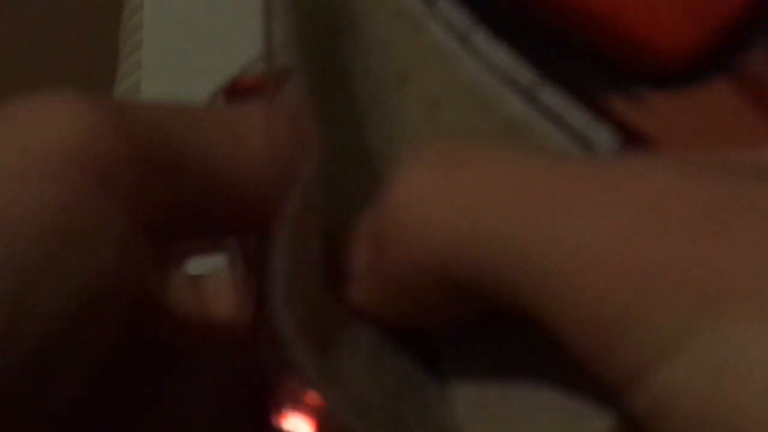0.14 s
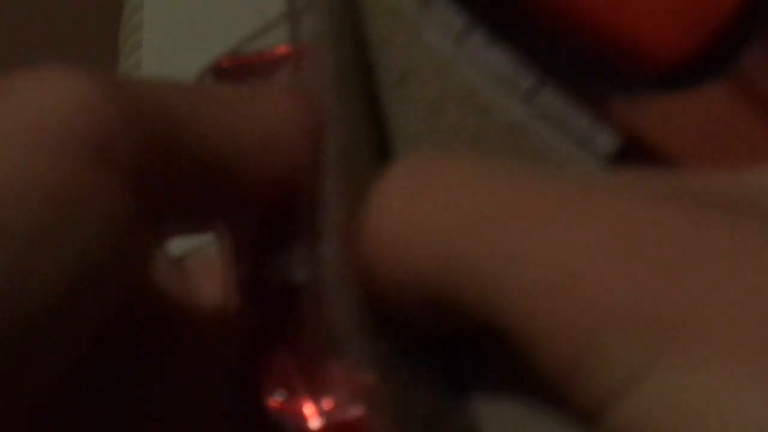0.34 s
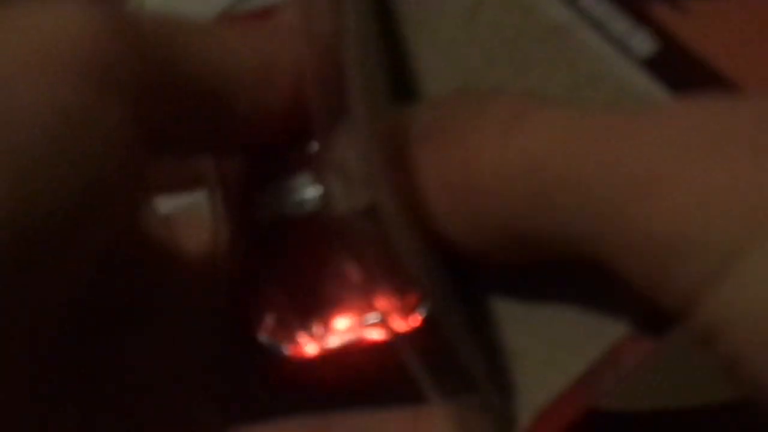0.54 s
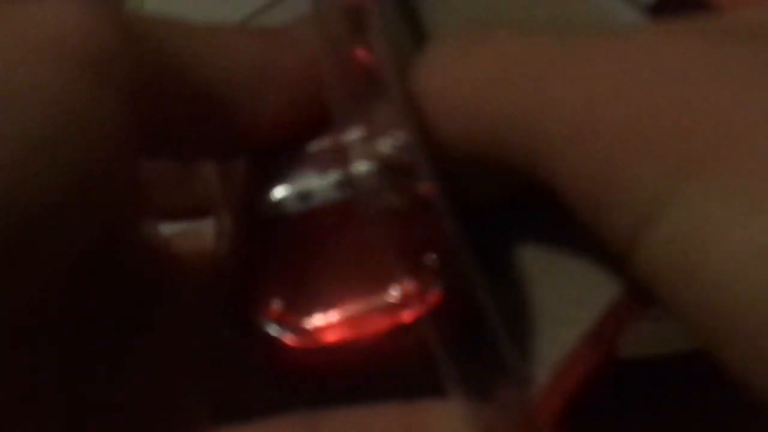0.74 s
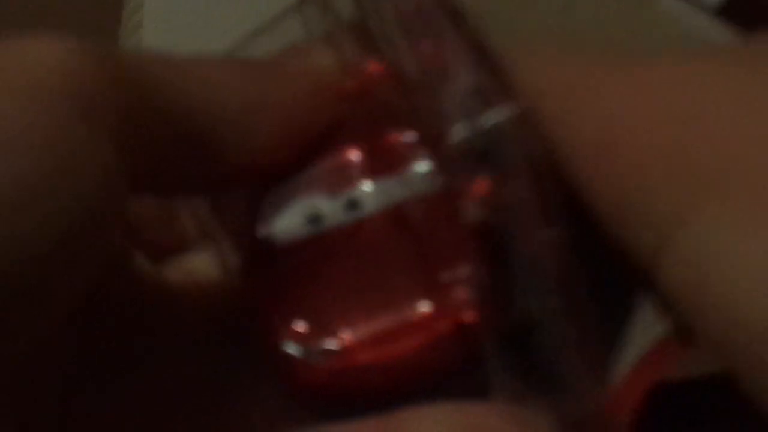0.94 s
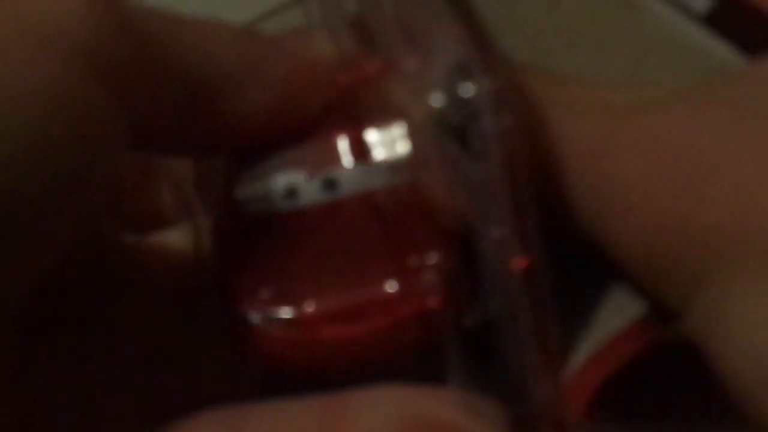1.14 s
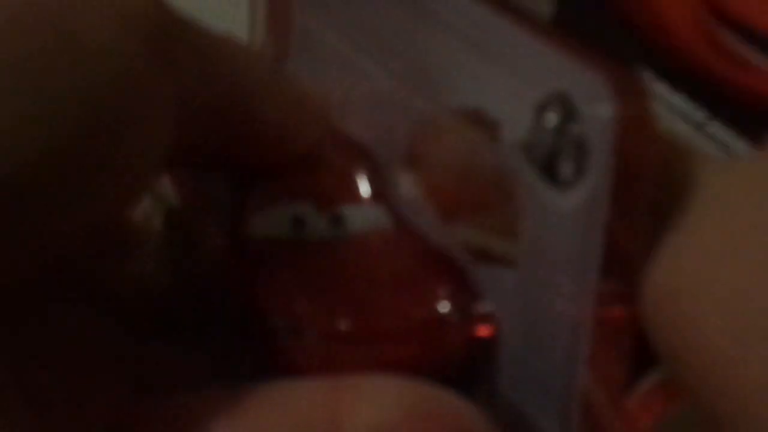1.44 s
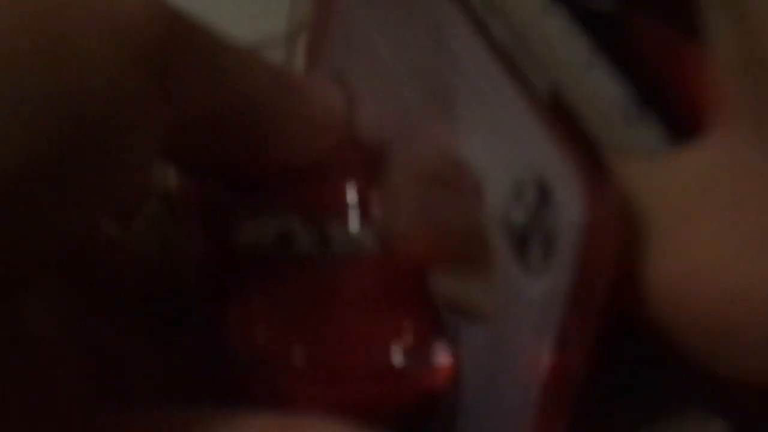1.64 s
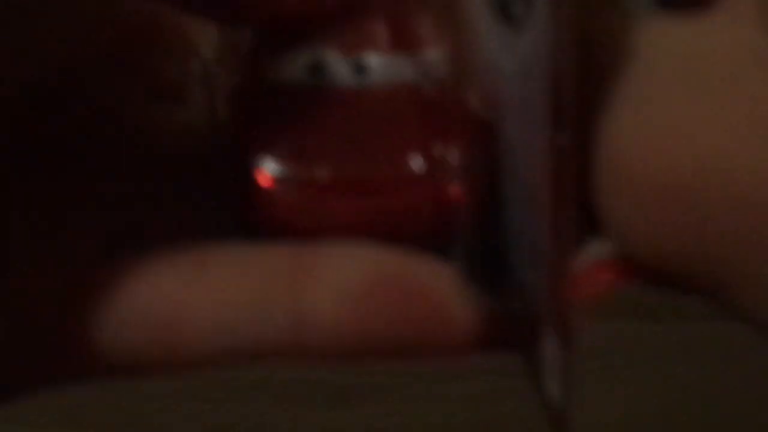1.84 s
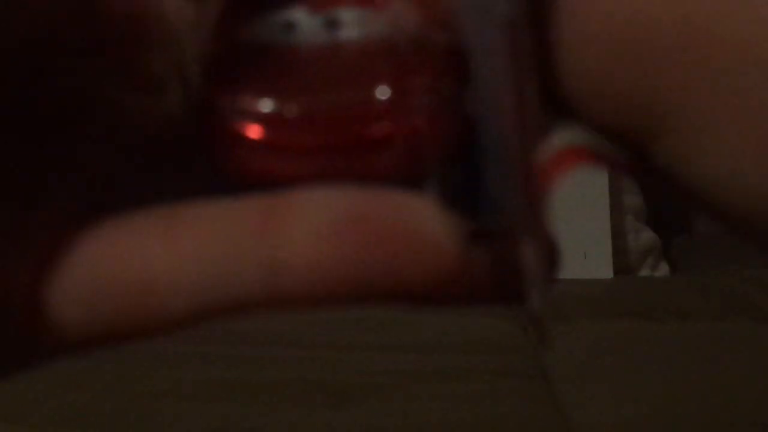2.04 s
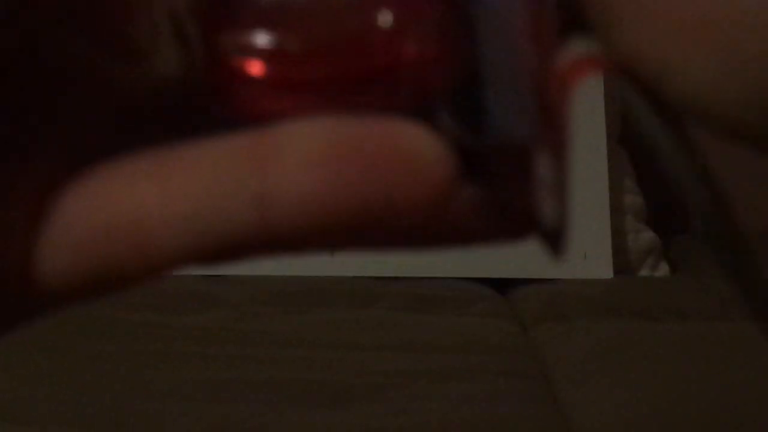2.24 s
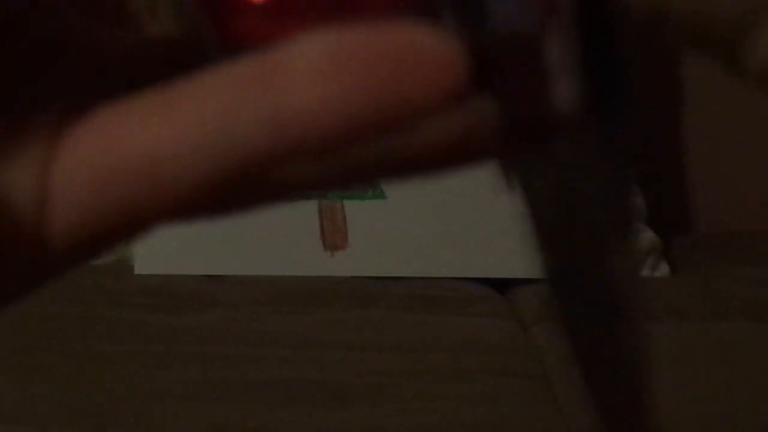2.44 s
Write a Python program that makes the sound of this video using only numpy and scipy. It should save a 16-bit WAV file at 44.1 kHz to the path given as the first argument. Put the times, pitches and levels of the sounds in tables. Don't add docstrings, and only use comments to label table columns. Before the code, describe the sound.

Stiff plastic packaging buckles and tears from card, close in a small bare room. After brief hiss, a very loud clipped pop cluster bursts at 0.2 s and rings out. Lighter pops follow around 0.6 s, sharper crackling at 0.8 and 1.05, fine ticks and rubbing with soft table bumps from 1.25 to 1.65, faint rustle near 1.8-2.1, then ticks and a strong bright crack around 2.4.

```python
import sys
import numpy as np
from scipy import signal
from scipy.fft import rfft, irfft
from scipy.io import wavfile

SR = 44100
rng = np.random.default_rng(int(sys.argv[2]) if len(sys.argv) > 2 else 0)


def log_audio(samples):
    frames = np.atleast_2d(samples).T
    limited = np.clip(frames, -1, 1)
    pcm = np.round(limited * 32767).astype(np.int16)
    wavfile.write(sys.argv[1], SR, pcm)


def voltage_ratio(decibels):
    exponent = np.asarray(decibels, float) / 20
    return 10 ** exponent


N = 114660

# frequency in Hz, level in dB, t60 in seconds.
SHELL = [(308.8, -18.5, .025), (401, -13.5, 0.0248), (700, -13.5, 0.025), (936, -1.5, 0.0091),
         (1200, -7.5, 0.028), (1700, 4, 0.0058), (2005, 5.5, 0.0033), (2910, -4.5, 0.007),
         (3260, 3.5, 0.0032), (4300, -3, 0.0038), (6030, 2.5, 0.00083), (9180, -6.5, 0.0013),
         (11000, -4.5, 0.0011), (14580, -8.5, 0.00067)]


def rms_one(x):
    return x / np.sqrt(np.mean(x ** 2) + 1e-20)


def ring(clicks, hz, t60_s):
    radius = voltage_ratio(-60 / (t60_s * SR))
    angle = 2 * np.pi * hz / SR
    poles = [1, -2 * radius * np.cos(angle), radius ** 2]
    return signal.lfilter([0, np.sin(angle)], poles, clicks + 1e-18)


def colour_db(hz, panel_hz, tilt_db):
    lift_db, width_octaves = 5.5, 0.61
    octaves = np.log2(hz / panel_hz)
    lift = lift_db * np.exp(-0.5 * (octaves / width_octaves) ** 2)
    return lift + tilt_db * np.maximum(octaves, 0)


def hiss():
    # frequency in Hz, density in dB per Hz.
    spectrum = [(20, -8.5), (55, -25.5), (130, -2.5), (300, -2), (800, 3), (2500, -6.5), (6000, -11),
                (15000, -13.5)]
    level_db = -54
    hz = np.maximum(np.fft.rfftfreq(N, 1 / SR), 1)
    at_hz, density_db = np.transpose(spectrum)
    gain = voltage_ratio(np.interp(np.log(hz), np.log(at_hz), density_db))
    noise = irfft(rfft(rng.standard_normal(N)) * gain, N)
    return voltage_ratio(level_db) * rms_one(noise)


def pops():
    # start in seconds, peak in dB, pitch of the bent panel in Hz, brightness in dB per octave. The
    # quiet row at 0.782 s is a soft knock, voiced with a low 500 Hz pitch.
    buckles = [(0.199, -18, 1360, -36), (0.212, 8.5, 1700, -1), (0.2126, 2.5, 1630, -6.5),
               (0.2144, 6.5, 980, 0.5), (0.2157, 1, 700, 4), (0.5872, -25.5, 1570, -4),
               (0.6026, -20.5, 1300, -4.5), (0.6321, -12, 2570, 2), (0.6386, -23, 1510, -16),
               (0.8175, -43, 3020, 10), (0.8245, -8.5, 2130, 3), (0.8301, -41, 2580, -10),
               (0.8481, -13.5, 1290, -2.5), (1.0231, -18, 970, 7), (1.0705, -25.5, 2500, -1),
               (0.782, -40, 500, 0.5), (1.4, -23, 2830, 0), (1.5965, -11, 1045, 0), (1.612, -21, 1750, -19),
               (1.63, -35, 1010, -27.5), (1.8165, -32.5, 1200, -6), (1.8729, -30, 1240, -18),
               (2.3895, -28.5, 760, -5), (2.41, -6, 1100, 6.5), (2.428, -18.5, 734, 6.5),
               (2.4558, -15.5, 840, -2)]
    slip_s, slip_loss_db, mode_spread_db = 0.0006, 6, 4.5
    panel_ring_db, panel_cycles = 7, 10.9
    length = SR // 10
    out = np.zeros(N + length)
    slip = np.arange(4)
    lateness = rng.uniform(-0.45, 0.45, (len(buckles), len(slip)))
    luck = rng.standard_normal((len(buckles), len(SHELL) + 1, 2, len(slip)))
    for (start_s, peak_db, panel_hz, tilt_db), late, draws in zip(buckles, lateness, luck):
        at = (slip_s * (slip + (slip > 0) * late) * SR).astype(int)
        modes = [*SHELL, (panel_hz, panel_ring_db, panel_cycles / panel_hz)]
        pop = np.zeros(length)
        side = -1
        for (hz, level_db, t60_s), (size, sign) in zip(modes, draws):
            gain_db = level_db + colour_db(hz, panel_hz, tilt_db)
            gain_db = gain_db - slip_loss_db * slip + mode_spread_db * size
            direction = np.where(slip > 0, np.sign(sign), side)
            clicks = np.zeros(length)
            np.add.at(clicks, at, direction * voltage_ratio(gain_db))
            pop += ring(clicks, hz, t60_s)
            side = -side
        first = int(start_s * SR)
        out[first:first + length] += voltage_ratio(peak_db) * pop / np.abs(pop).max()
    return out[:N]


def runs():
    # start in seconds, length in seconds, rms in dB, pitch in Hz, brightness in dB per octave.
    strokes = [(1.0179, 0.01, -30, 980, -2), (2.409, 0.0092, -31, 1070, -4), (0.454, 0.062, -48, 2050, 3),
               (0.681, 0.063, -54.5, 2460, 5), (.8, 0.014, -51.5, 2950, 5), (0.8128, 0.016, -25, 3130, 1.5),
               (0.822, 0.053, -34, 1810, 6), (1.026, 0.057, -45.5, 2020, 6.5),
               (1.247, 0.084, -52.5, 1200, 4.5), (1.302, 0.021, -41.5, 1060, -3.5),
               (1.353, 0.032, -34, 610, -2.5), (1.379, 0.061, -46.5, 1920, 4),
               (1.593, 0.064, -33, 447, -5.5), (1.782, 0.077, -56, 1300, 5.5),
               (1.843, 0.072, -48, 1240, -1), (1.913, 0.032, -51.5, 1430, 2), (1.962, 0.12, -60.5, 1440, 5),
               (2.034, 0.13, -54, 3140, 8.5), (2.352, 0.0078, -50.5, 2900, 14),
               (2.358, 0.015, -36.5, 800, 5.5), (2.38, 0.0065, -35.5, 2040, 6.5),
               (2.394, 0.051, -30, 880, -24.5), (2.448, 0.02, -36, 700, 1.5), (2.361, 0.18, -47.5, 960, 6)]
    cracks_per_s, crack_spread_db, rise_share = 4000, 3, 0.32
    out = np.zeros(N)
    t = np.arange(N) / SR
    size = voltage_ratio(crack_spread_db * np.minimum(rng.exponential(1, N), 3))
    cracks = rms_one(size * (rng.random(N) < cracks_per_s / SR))
    for hz, level_db, t60_s in SHELL:
        stroke = np.zeros(N)
        for start_s, length_s, rms_db, panel_hz, tilt_db in strokes:
            corners_s = start_s + length_s * np.array([0, rise_share, 1])
            shape = np.interp(t, corners_s, [0, 1, 0.2], left=0, right=0)
            stroke += shape * voltage_ratio(rms_db + level_db + colour_db(hz, panel_hz, tilt_db))
        out += ring(voltage_ratio(-16.5) * stroke * cracks * rng.standard_normal(N), hz, t60_s)
    return out


def ticks():
    # start in seconds, peak in dB, pitch in Hz.
    threads = [(.7995, -41, 8000), (1.066, -33.5, 8250), (1.181, -41, 8800), (1.2555, -34.5, 5760),
               (1.2685, -26, 5200), (1.991, -43, 4000), (2.019, -44, 11000), (2.0602, -28, 6100),
               (2.2245, -40, 10000), (2.262, -39.5, 11000), (2.2901, -35, 5000), (2.369, -16.5, 9000),
               (2.3755, -11.5, 7000), (2.4171, -27, 10560), (2.44, -33, 9100), (2.445, -23, 11000),
               (2.453, -30, 11000)]
    t60_s, fray_s = 0.0008, 0.0007
    length = 400
    out = np.zeros(N + length)
    t = np.arange(length) / SR
    thin = signal.butter(2, 1500, "high", fs=SR, output="sos")
    frays = rng.standard_normal((len(threads), length))
    for (start_s, peak_db, hz), fray in zip(threads, frays):
        burst = fray * np.exp(-t / fray_s)
        tick = ring(burst, hz, t60_s) + signal.sosfilt(thin, burst)
        first = int(start_s * SR)
        out[first:first + length] += voltage_ratio(peak_db) * tick / np.abs(tick).max()
    return out[:N]


def bumps():
    # start in seconds, peak in dB.
    knocks = [(.85, -48.5), (1.308, -43), (1.364, -35.5), (1.402, -45), (1.599, -38.5), (1.662, -51),
              (1.815, -54.5), (2.363, -49)]
    table_hz, t60_s = 98.3, 0.076
    start_s, peak_db = np.transpose(knocks)
    clicks = np.zeros(N)
    clicks[(start_s * SR).astype(int)] = voltage_ratio(peak_db)
    return ring(clicks, table_hz, t60_s) + 0.28 * ring(clicks, 1.51 * table_hz, t60_s)


def room(x):
    # band centre in Hz, level in dB, t60 in seconds.
    bands = [(200, -17, 0.82), (500, -13, 0.39), (1200, -13, 0.51), (2380, -12.5, 0.51), (4000, -8.5, 0.39),
             (7000, -16, 0.53), (12000, -15, 0.33)]
    first_wall_s, fill_s, table_share = 0.0083, 0.019, 0.7
    t = np.arange(SR) / SR
    fill = np.clip((t - first_wall_s) / fill_s, table_share * (t > 0.001), 1)
    answer = np.zeros(SR)
    for hz, level_db, t60_s in bands:
        band = signal.butter(2, [hz / 1.635, hz * 1.335], "band", fs=SR, output="sos")
        tail = signal.sosfilt(band, rng.standard_normal(SR))
        answer += voltage_ratio(level_db - 28.5 - 60 * t / t60_s) * tail
    return signal.fftconvolve(x, answer * fill)[:N]


def scene():
    sheet_cut_hz = 261
    side_db, side_follow_db = -75, -36
    no_bass = signal.butter(3, sheet_cut_hz, "high", fs=SR, output="sos")
    pack = signal.sosfilt(no_bass, pops() + ticks() + runs())
    mono = pack + room(pack) + bumps() + hiss()
    smear = rms_one(rng.standard_normal(400)) / 20
    blurred = signal.fftconvolve(np.clip(mono, -1, 1), smear)[200:N + 200]
    side = voltage_ratio(side_db) * rng.standard_normal(N) + voltage_ratio(side_follow_db) * blurred
    return mono + side * [[1], [-1]]


def low_pass(x):
    return signal.sosfilt(signal.butter(12, 15070, fs=SR, output="sos"), x)


def record(dry):
    mic_cut_hz, top_stop_hz = 78, 15350
    low_cut = signal.butter(1, mic_cut_hz, "high", fs=SR, output="sos")
    top_cut = signal.cheby2(10, 40, top_stop_hz, fs=SR, output="sos")
    clipped = np.clip(dry, -1, 1)
    mix = signal.sosfilt(top_cut, signal.sosfilt(low_cut, clipped))
    return low_pass(mix)


dry = scene()
out = record(dry)
log_audio(out)
```